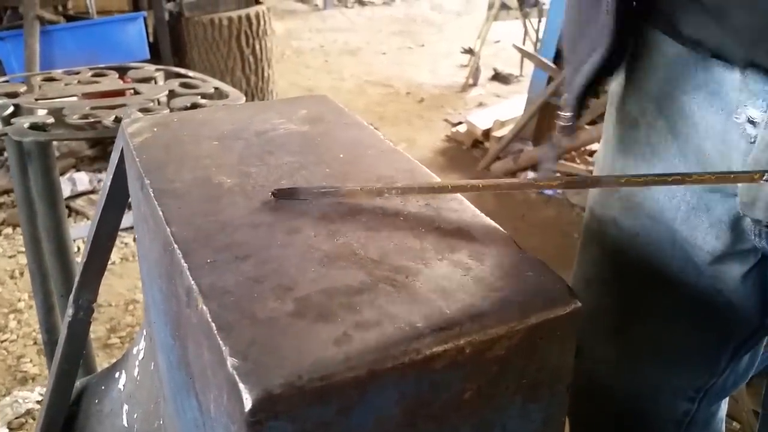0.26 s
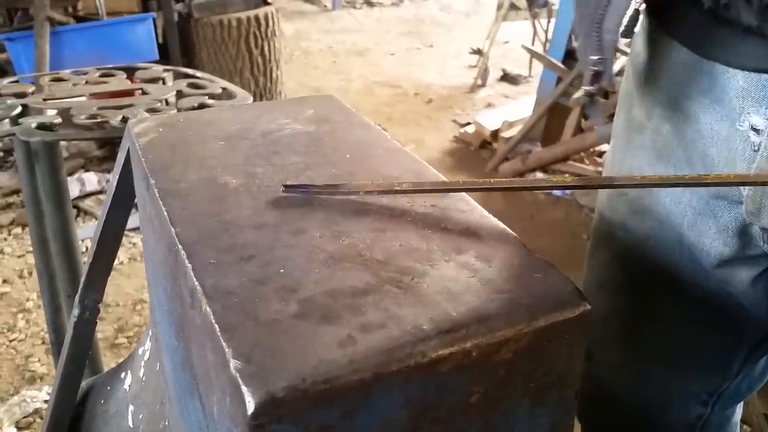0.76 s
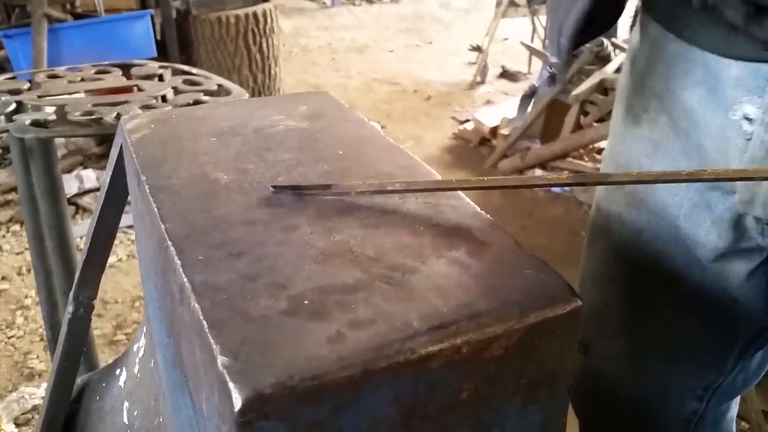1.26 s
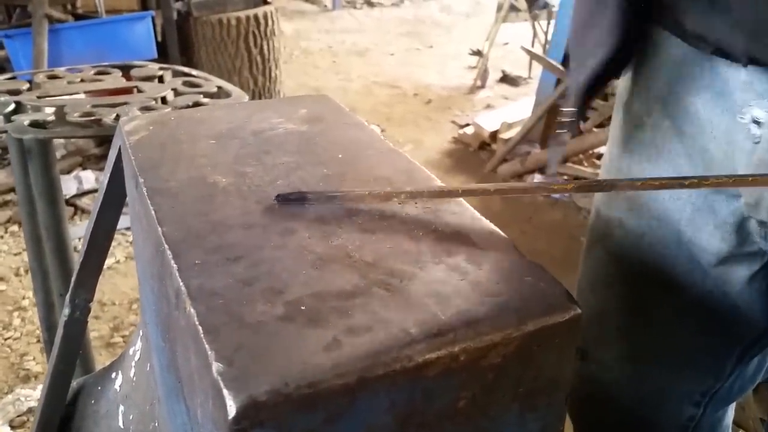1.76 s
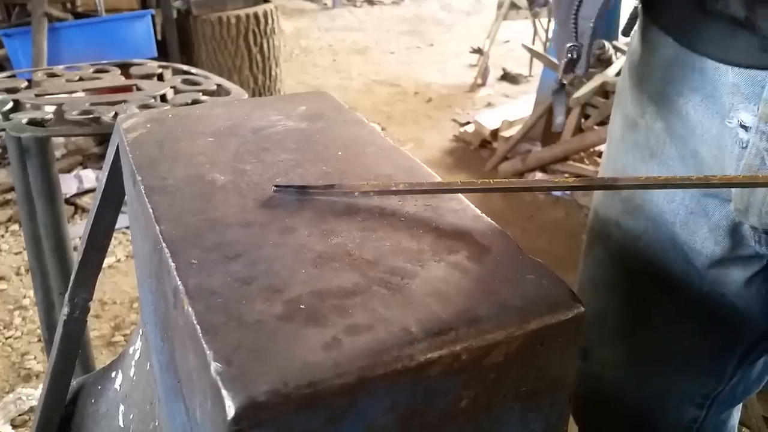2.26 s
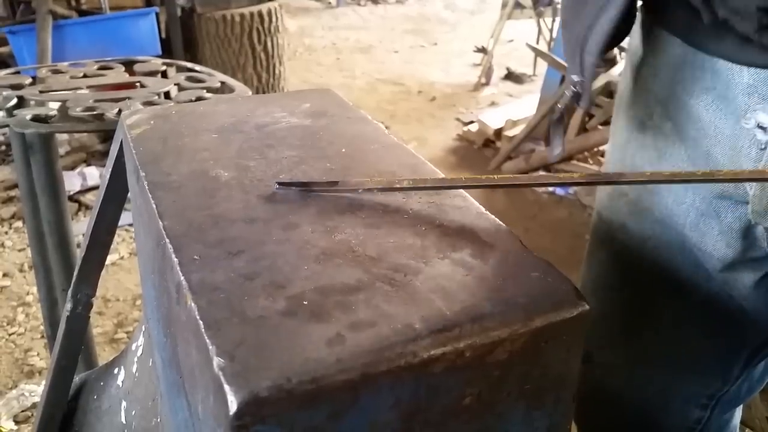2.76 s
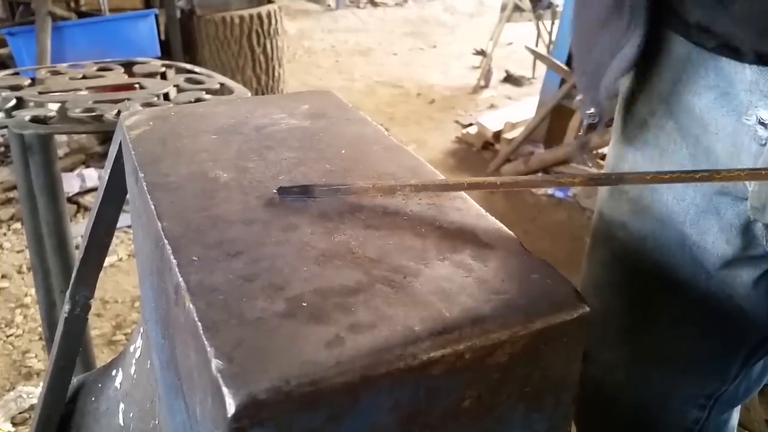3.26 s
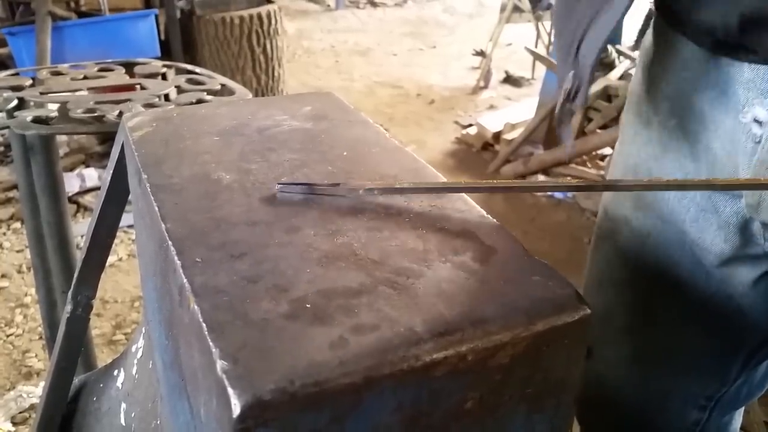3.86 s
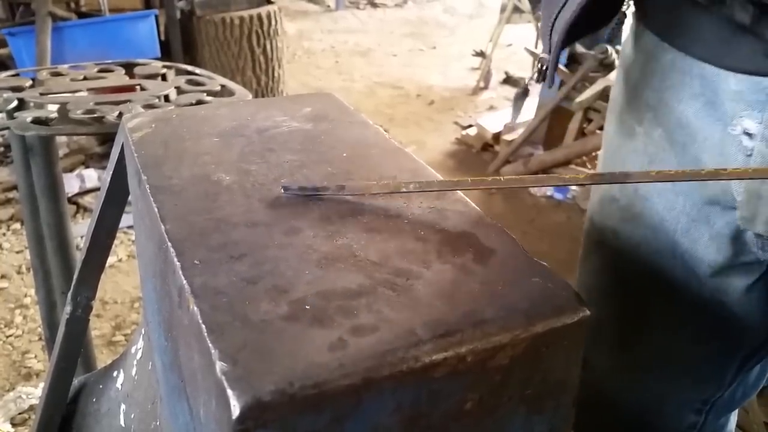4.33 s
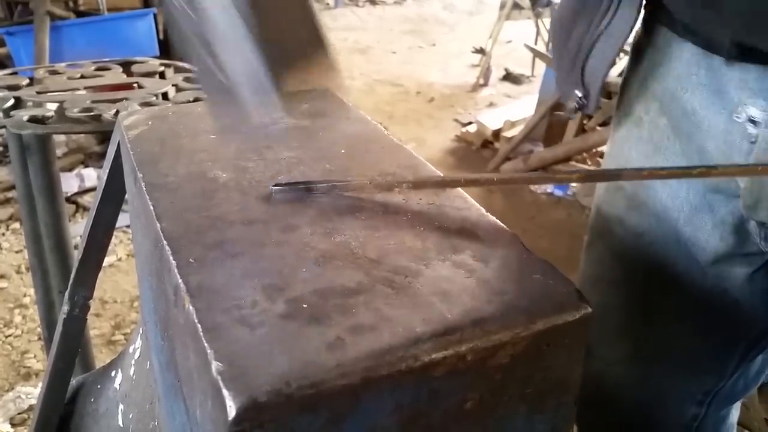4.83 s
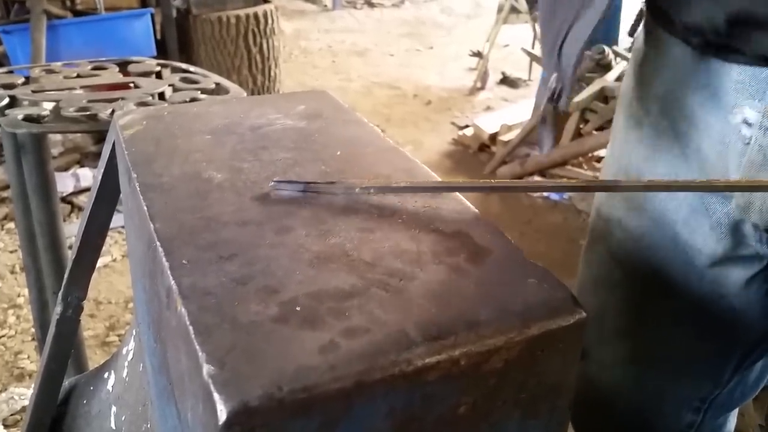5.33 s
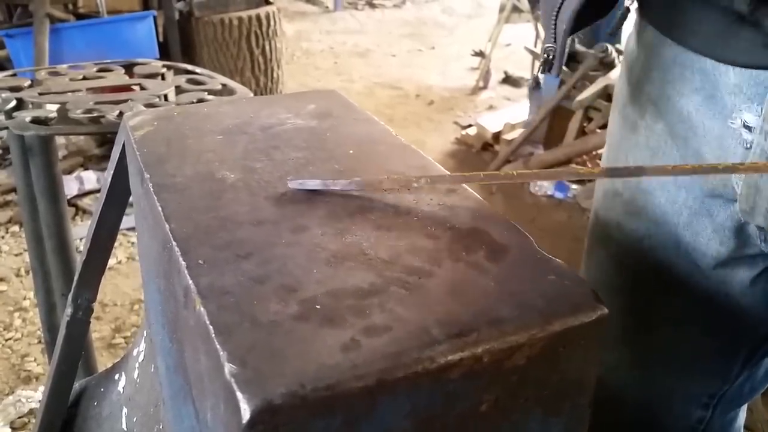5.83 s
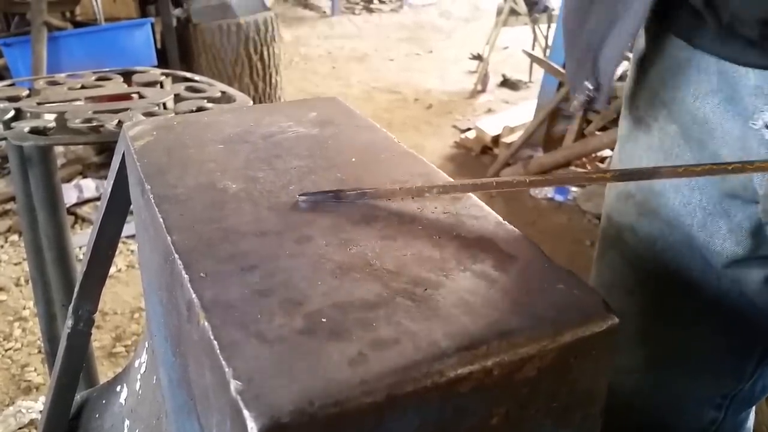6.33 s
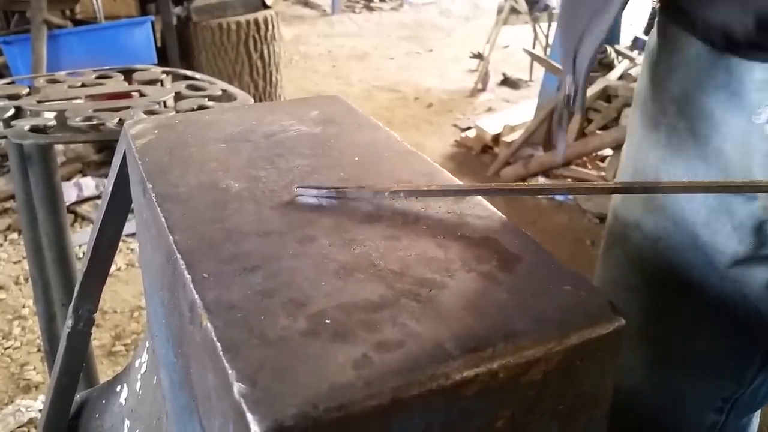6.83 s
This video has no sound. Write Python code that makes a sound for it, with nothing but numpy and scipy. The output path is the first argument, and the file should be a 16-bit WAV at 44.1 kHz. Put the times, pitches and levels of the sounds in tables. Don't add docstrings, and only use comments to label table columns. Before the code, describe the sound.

A hammer strikes a thin steel rod on an anvil in steady, evenly spaced blows, each a low knock with a crisp crack and short bright ring.

```python
import sys
import numpy as np
from scipy import signal
from scipy.fft import rfft, irfft, next_fast_len
from scipy.io import wavfile
from scipy.ndimage import uniform_filter1d, minimum_filter1d, map_coordinates

SR = 44100
rng = np.random.default_rng(int(sys.argv[2]) if len(sys.argv) > 2 else 0)


def decibels_to_gain(level_db):
    exponent = np.asarray(level_db, float) / 20
    return 10 ** exponent


def persist_wave(psi):
    counts = np.round(np.clip(psi, -1, 1) * 32767).astype(np.int16)
    wavfile.write(sys.argv[1], SR, np.atleast_2d(counts).T)


N = 312669
T = np.arange(SR) / SR
TOP_HZ = 14550

# start_s, crack_db, ping_db, second_ping_db, shimmer_db
BLOWS = [
    (0.45, -34.5, -45.5, -55, -31.5),
    (1.196, -21, -41, -54.5, -28),
    (1.943, -30, -39.5, -51, -30),
    (2.6913, -20.5, -42, -48, -30),
    (3.432, -21.5, -41.5, -51.5, -28.5),
    (4.16, -18.5, -56, -54.5, -32),
    (4.906, -23.5, -56, -57.5, -33.5),
    (5.631, -18.5, -45, -49, -33.5),
    (6.353, -20.5, -47.5, -61, -35),
]
EARLIER_BLOW = [(-.29, -30, -46, -55, -33)]

# pitch_hz, level_db, t60_s
STAND_MODES = [(65, -17, .06), (140, -12, .045), (160, -12, .05), (215, -7, .045), (310, -1.5, .028),
               (395, -11, .045)]
# pitch_hz, level_db, t60_s
AIR_MODES = [(41.86, -37.5, 0.95), (69.73, -22.5, 1), (75.98, -25, 0.9), (128.6, -18.5, 0.26),
             (145.2, -26.5, 0.34), (178.5, -27.5, 0.34), (246, -27.5, .4), (366.7, -25, 0.65)]
# delay_s, gain
WALLS = [(.0153, .2), (.0207, -.35), (.0224, .3), (.0253, .45), (.0268, -.3), (.0333, .4), (.041, .2),
         (.0505, .15)]
# frequency_hz, t60_s
SHED_DECAY = [(30, .3), (80, .55), (400, .42), (1000, .5), (2500, .45), (4000, .32), (7000, .25),
              (12000, .27)]
# frequency_hz, correlation
ALIKE = [(60, .9), (300, 0.9), (640, 0.28), (1400, 0)]

# frequency_hz, density_db_per_hz
KNOCK = [(300, -12), (600, -2), (900, -1.5), (1400, -6), (2000, -15.5), (2800, -19), (3600, -22),
         (5000, -41)]
# frequency_hz, density_db_per_hz
JOLT = [(25, -2), (150, 0), (350, -5), (550, -20), (900, -30), (2000, -55)]
# frequency_hz, density_db_per_hz
CRACK = [(200, -16.5), (550, -6), (900, 6.5), (1500, -8.5), (2200, -10), (3500, -37.5), (9000, -53.5),
         (14400, -28)]
# frequency_hz, left_minus_right_db
PORTS = [(3000, 0), (4600, 8), (6200, 6), (7000, -2), (9000, -16), (11600, -21), (13000, -12), (14400, 2)]

# pitch_hz, level_under_shimmer_db, t60_s
STEEL_MODES = [(2874, -35.5, 0.18), (3950, -17, 0.036), (4066, -27.5, .1), (4615, -17.5, 0.07),
               (5278, -24, 0.029), (5800, -30.5, 0.18), (6595, -25.5, 0.089), (6770, -19.5, 0.093),
               (7600, -24, 0.094), (8160, -29, 0.053), (10610, -9, .04), (11840, -18.5, 0.13),
               (11700, -16.5, 0.068), (10900, -19.5, 0.13), (13000, -5.5, .045), (14400, -12, 0.045)]
# pitch_hz, t60_s
PING = (6950, .13)
# pitch_hz, t60_s
SECOND = (6190, .08)
# frequency_hz, density_db_per_hz
SHIMMER_LEFT = [(2500, -50), (3500, -33), (5500, -33), (6800, -22), (7900, -44), (10150, -46), (10600, -27),
                (11600, -24), (12300, -29), (13000, -11), (13600, -16), (14400, -11)]
# frequency_hz, density_db_per_hz
SHIMMER_RIGHT = [(2500, -50), (3800, -33), (5000, -44), (6800, -23), (8600, -32), (9300, -16), (10100, -14),
                 (10600, -5), (11050, -11), (11600, 0), (12300, -9), (13000, -1), (13600, -11),
                 (14400, -14)]

# frequency_hz, density_db_per_hz
RUMBLE = [(15, -53.5), (25, -25), (39, -4), (62, -2.5), (79, 2.5), (120, -5), (200, -7), (250, -16),
          (310, -23), (600, -35), (1300, -85.5)]
# frequency_hz, density_db_per_hz
AIR = [(150, -29), (250, 1.5), (269, -9), (363, 0), (420, -4.5), (826, -13), (1180, -20), (1530, -24),
       (3000, -48), (3900, -78.5), (6600, -120)]
# time_s, level_db
TRAFFIC = [
    (0, -87),
    (1.9, -80.5),
    (3.3, -72.5),
    (4.101, -71),
    (4.7, -65),
    (5.501, -69),
    (6.702, -64.5),
    (7.09, -68.5),
]
# low_db, low_t60_s, middle_db, middle_t60_s
YARD_ECHO = (-47.5, 2.46, -57.5, 1.54)

# start_s, peak_db, left_minus_right_db
FLAKES = [(0.0496, -71, -11.5), (1.1798, -69.5, 3), (1.485, -69.5, -6), (1.5324, -72, -13.5),
          (3.337, -78, -10), (3.3987, -68.5, -17), (3.69, -63, -23), (3.9094, -83, -12), (4.142, -72, -12),
          (4.3294, -65, -16.5), (4.578, -66, -17), (4.8687, -79, -16.5), (5.17, -67.5, -21),
          (5.2844, -69, -8), (6.3194, -68, -6), (6.5235, -44.5, -15.5)]
# start_s, level_db, t60_s
SHOWERS = [
    (-.05, -79.5, .8),
    (1.196, -72.5, 1.14),
    (2.692, -79.5, .8),
    (3.432, -76, .9),
    (4.162, -75, 1.7),
    (4.87, -115, .5),
]
# frequency_hz, gain_db
SCALE_PORT = [(3000, -41.5), (9600, -25.5), (10600, -6.0), (11500, 7), (12200, -5), (12800, -4), (14400, -19.5)]

# frequency_hz, level_from_treble_mean_db
DROP_THRESHOLD = [(3000, -30.5), (4300, -19), (5200, -16.5), (6500, -25.5), (8000, -12), (9800, -10), (10800, -22),
                  (14500, -31.5)]
# frequency_hz, gain_db
PHONE_BAND = [(10, -12), (28, 0), (TOP_HZ - 150, 0), (TOP_HZ + 250, -35), (16000, -70)]


def unit(x):
    return x / np.sqrt(np.mean(x ** 2) + 1e-20)


def along(points, hz):
    f, v = np.transpose(points)
    return np.interp(np.log(hz + 1), np.log(f + 1), v)


def filtered(x, response):
    m = next_fast_len(x.shape[-1] + 4096)
    spectrum = rfft(x, m) * response(np.fft.rfftfreq(m, 1 / SR))
    return irfft(spectrum, m)[..., :x.shape[-1]]


def noise(n, spectrum, alike):
    def shape(hz):
        turn = np.arccos(np.clip(along(alike, hz), -1, 1)) / 2
        return decibels_to_gain(along(spectrum, hz)) * [np.cos(turn), np.sin(turn)]

    mid, side = filtered(rng.standard_normal((2, n)), shape)
    return unit(np.array([mid + side, mid - side]))


def wobble(rate):
    knots = rng.standard_normal(int(N * rate / SR) + 4)
    return map_coordinates(knots, [np.arange(N) * rate / SR])


def ring(hz, db, t60, phase=0):
    return decibels_to_gain(db - 60 * T / t60) * np.sin(2 * np.pi * hz * T + phase)


def late(x, s):
    before = max(round(s * SR), 0)
    return np.pad(x, [(0, 0)] * (x.ndim - 1) + [(before, 0)])[..., :SR]


def between_ports(x):
    return filtered(x, lambda hz: decibels_to_gain(along(PORTS, hz) * [[.5], [-.5]]))


def shed(x, wet_db):
    hz, t, z = signal.stft(noise(SR, [(100, 0)], ALIKE), SR, nperseg=256)
    decay = decibels_to_gain(-60 * t / along(SHED_DECAY, hz)[:, None])
    tail = signal.istft(z * decay, SR, nperseg=256)[1][:, :SR]
    tail = tail * (1 - np.exp(-(T / 0.015) ** 2))
    return decibels_to_gain(wet_db) * signal.fftconvolve(x, tail / np.linalg.norm(tail[0]), axes=1)[:, :SR]


def thud():
    stand = sum(ring(*mode) for mode in STAND_MODES) * (1 - np.exp(-T / .0004))
    stand = late(stand, .003)
    walls = sum(gain * late(stand, s) for s, gain in WALLS)
    air = sum(ring(*mode) for mode in AIR_MODES) * (1 - np.exp(-T / 0.0071))
    impulse = late(np.exp(-T * SR), .004)
    knock = decibels_to_gain(-28.5) * unit(filtered(impulse, lambda hz: decibels_to_gain(along(KNOCK, hz))))[None]
    return stand + walls + air + shed(np.array([stand] * 2), wet_db=-5) + shed(knock, wet_db=-14.5)


def squeeze(crack_db):
    return -decibels_to_gain(crack_db + 5) * np.exp(-((T - .0008) / .0002) ** 2)


def jolt():
    level_db = -10.5 + np.array([[-2], [2]])
    rise = 1 - np.exp(-(T / .0012) ** 2)
    return noise(SR, JOLT, [(100, 0.27)]) * decibels_to_gain(level_db - 60 * T / .032) * rise


def crack(crack_db):
    burst = noise(SR, CRACK, [(100, 0.31)]) * decibels_to_gain(crack_db - 5.5 - 60 * T / 0.021)
    return between_ports(burst)


def steel(second_db, shimmer_db):
    modes = [(SECOND[0], second_db + 14, SECOND[1])]
    for hz, db, t60 in STEEL_MODES:
        modes.append((hz, shimmer_db + db + 0.5 + rng.normal(0, 0.98), t60))
    rung = 0
    for mode in modes:
        phase = 2 * np.pi * rng.random() + rng.normal(0, 1.0, (2, 1))
        rung = rung + ring(*mode, phase)
    rung = between_ports(rung * (1 - np.exp(-T / 0.0018)))

    def colour(hz):
        return decibels_to_gain([along(SHIMMER_LEFT, hz), along(SHIMMER_RIGHT, hz)])

    dense = unit(filtered(rng.standard_normal((2, SR)), colour))
    decay = decibels_to_gain(shimmer_db + 8.5 - 60 * T / 0.015) + decibels_to_gain(shimmer_db - 3.0 - 60 * T / 0.094)
    return rung + dense * decay


def ping(db):
    hz, t60 = PING
    swell = .5 + (T / .025) ** 2
    lead = np.array([[.5], [-.5]]) * rng.normal(1.1, .3, (2, 1, 1))
    apart_hz = rng.choice([-1, 1]) * rng.uniform(9, 18)
    tone = swell * (ring(hz, 0, t60, lead[0]) + ring(hz + apart_hz, -6, t60, lead[1] - 1.2))
    tone = tone + shed(tone, wet_db=-8)
    return decibels_to_gain(db + 9.5) * tone / np.abs(tone.mean(axis=0)).max()


def hammer():
    out = np.zeros((2, N + 3 * SR))
    low = decibels_to_gain(-16) * thud()
    for s, crack_db, ping_db, *steel_db in list(EARLIER_BLOW) + list(BLOWS):
        shaken, cracked = jolt(), crack(crack_db)
        bright = late(steel(*steel_db), 0.00032)
        answer = shed(bright + decibels_to_gain(-9.5) * cracked, wet_db=0.5)
        blow = low + squeeze(crack_db) + shaken + cracked + bright + answer + ping(ping_db)
        out[:, SR + round(s * SR):][:, :SR] += blow
    return out[:, SR:SR + N]


def after(starts, db, t60):
    since = np.arange(N) / SR - np.reshape(starts, (-1, 1))
    since = np.clip(since, 0, None)
    rise = 1 - np.exp(-since / 0.034)
    fall = decibels_to_gain(np.reshape(db, (-1, 1)) - 60 * since / np.reshape(t60, (-1, 1)))
    return np.sum(rise * fall, axis=0)


def yard():
    starts = [blow[0] for blow in list(EARLIER_BLOW) + list(BLOWS)]
    low_db, low_t60, mid_db, mid_t60 = YARD_ECHO
    traffic = decibels_to_gain(np.interp(np.arange(N) / SR, *np.transpose(TRAFFIC)))
    rumble = np.hypot(decibels_to_gain(-58.5), after(starts, low_db, low_t60)) * decibels_to_gain(1.5 * wobble(6.3))
    air = np.hypot(traffic, after(starts, mid_db, mid_t60)) * decibels_to_gain(0.45 * wobble(3.9))
    return rumble * noise(N, RUMBLE, ALIKE) + air * noise(N, AIR, ALIKE)


def scale():
    ticks = np.zeros((2, N + SR))
    for s, db, pan_db in FLAKES:
        level_db = db + 6 + pan_db * np.array([[.5], [-.5]])
        tick = decibels_to_gain(level_db - 60 * T / 0.0085) * rng.standard_normal((2, SR))
        ticks[:, round(s * SR):][:, :SR] += tick
    grain = decibels_to_gain(12 + 3.6 * wobble(36) + [[-14], [0]])
    hiss = after(*np.transpose(SHOWERS)) * grain * rng.standard_normal((2, N))
    return filtered(ticks[:, :N] + hiss, lambda hz: decibels_to_gain(along(SCALE_PORT, hz)))


def scene():
    return hammer() + yard() + scale()


def drop_weak_treble(x):
    hz, _, z = signal.stft(x, SR, nperseg=1024)
    power = np.roll(abs(z) ** 2, -2, axis=2)
    treble = (hz > 3000) & (hz < TOP_HZ)
    mean = power[:, treble].mean(axis=1, keepdims=True)
    band = uniform_filter1d(power, size=5, axis=1)
    band = abs(uniform_filter1d(band, size=3, axis=2))
    dropped = treble[:, None] & (band < mean * decibels_to_gain(along(DROP_THRESHOLD, hz))[:, None] ** 2)
    lost = signal.istft(z * dropped, SR, nperseg=1024)[1][:, :N]
    curvature = np.diff(x, n=2, prepend=0, append=0)
    edge = abs(uniform_filter1d(np.sum(curvature ** 2, axis=0), size=128))
    attack = 1. * (edge > 300 * np.roll(edge, round(0.0089 * SR)))
    spared = -minimum_filter1d(-attack, size=1025, origin=-512)
    return x - lost * (1 - uniform_filter1d(spared, size=128))


def top_cut(x):
    return signal.sosfilt(signal.butter(12, 15860, fs=SR, output="sos"), x)


def record(dry):
    keep = np.exp(-1 / (0.013 * SR))
    power = signal.lfilter([1 - keep], [1, -keep], np.mean(dry ** 2, axis=0))
    ducked = dry * (1 + power / decibels_to_gain(-31) ** 2) ** -.15
    thinned = drop_weak_treble(ducked + decibels_to_gain(-90) * rng.standard_normal(dry.shape))
    heard = filtered(thinned, lambda hz: decibels_to_gain(along(PHONE_BAND, hz)))
    mix = heard + decibels_to_gain(-103.5) * rng.standard_normal(dry.shape)
    return top_cut(mix)


dry = scene()
out = record(dry)
persist_wave(out)
```